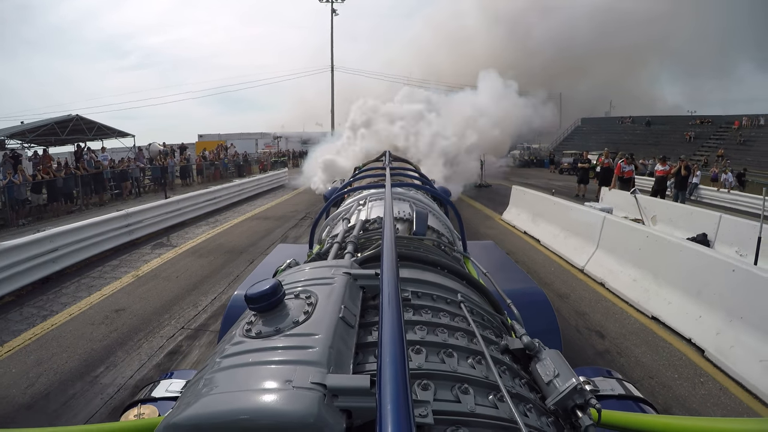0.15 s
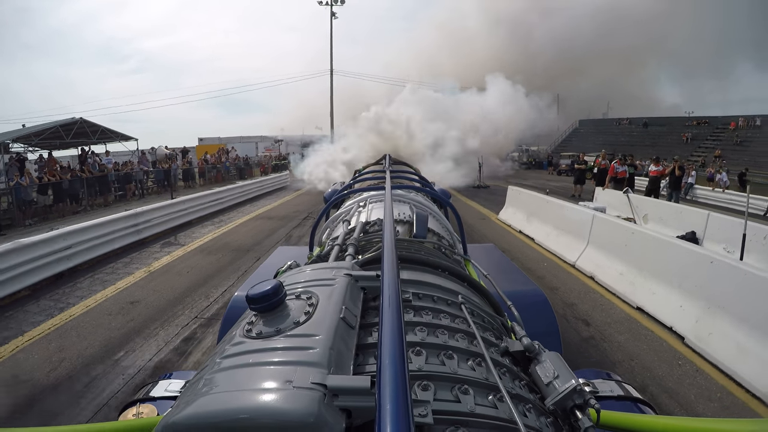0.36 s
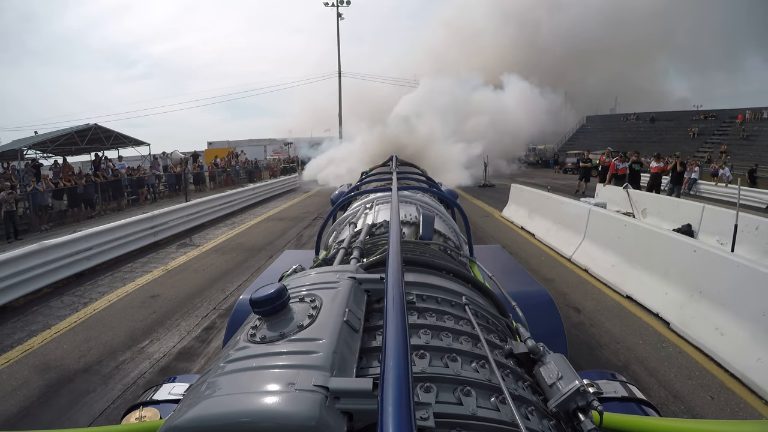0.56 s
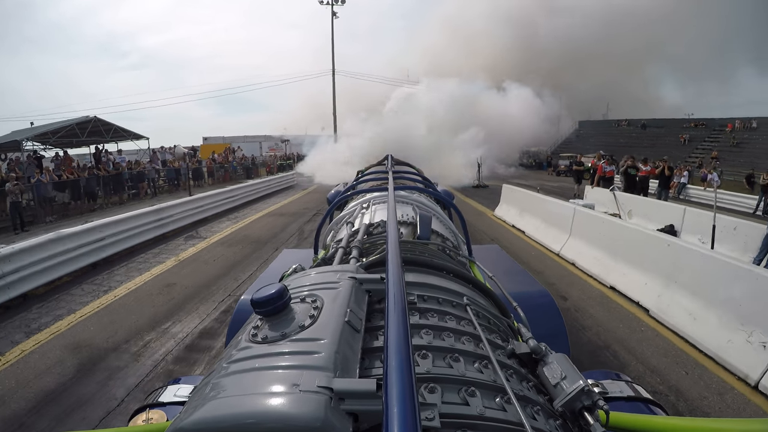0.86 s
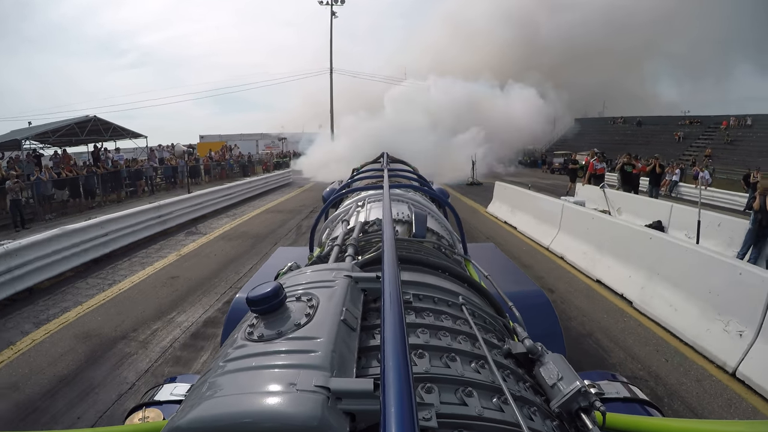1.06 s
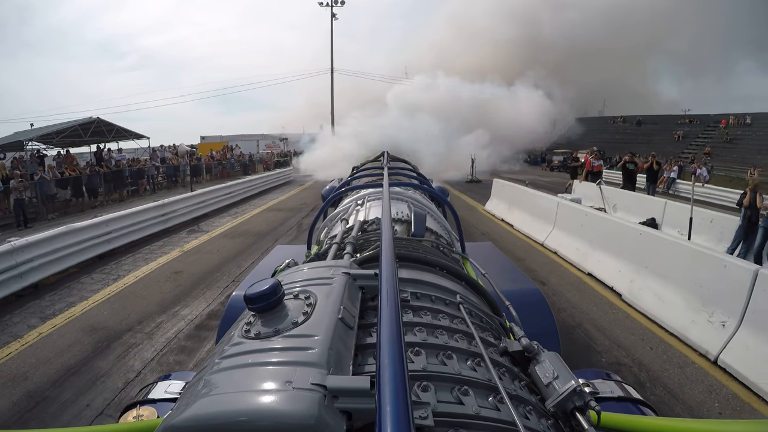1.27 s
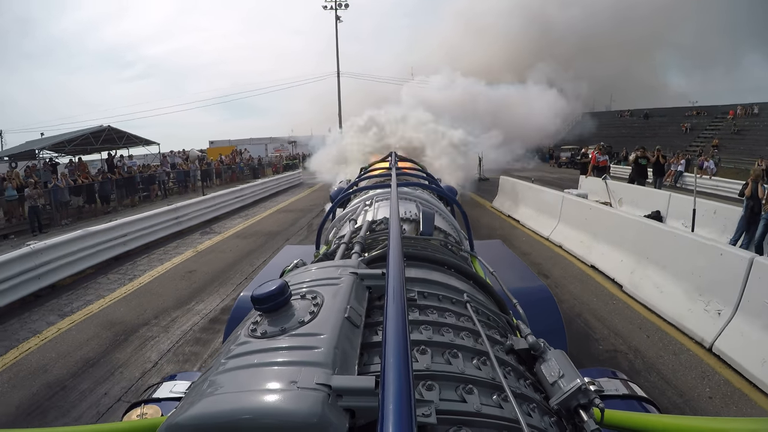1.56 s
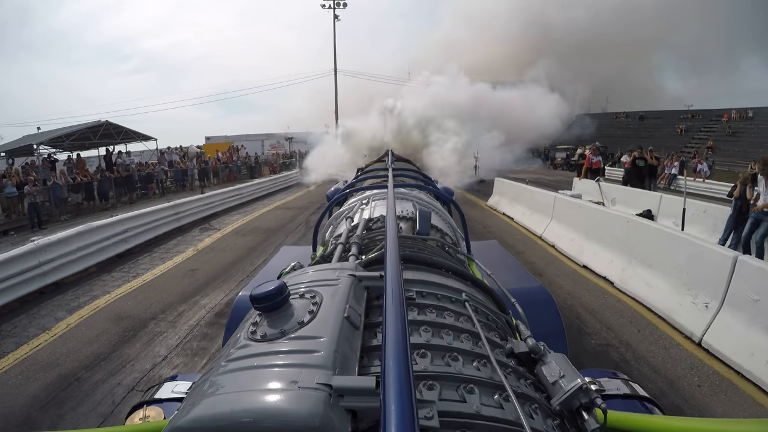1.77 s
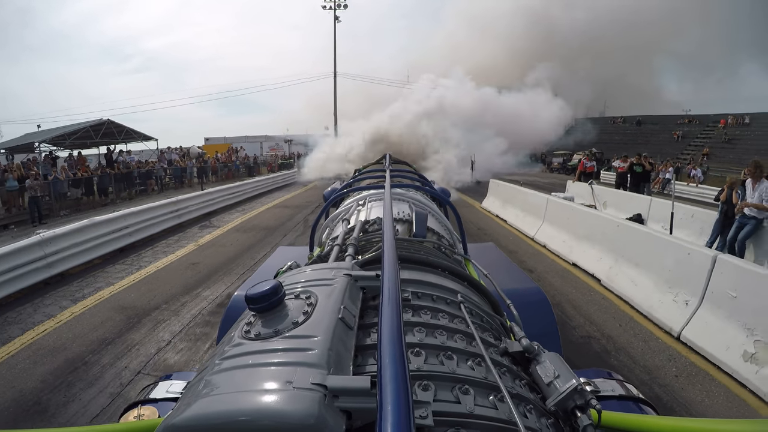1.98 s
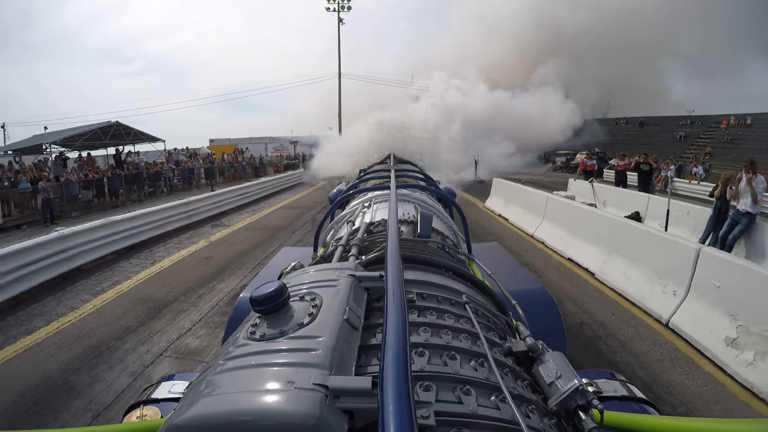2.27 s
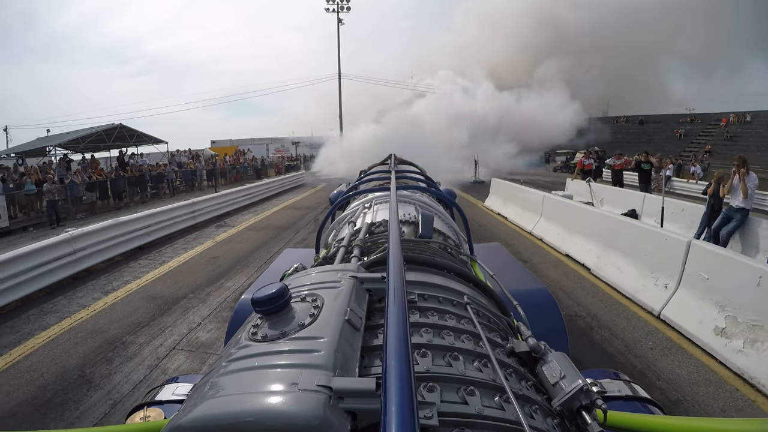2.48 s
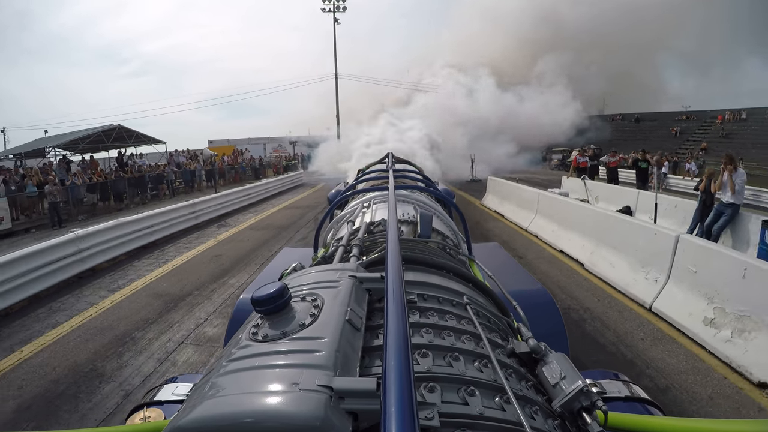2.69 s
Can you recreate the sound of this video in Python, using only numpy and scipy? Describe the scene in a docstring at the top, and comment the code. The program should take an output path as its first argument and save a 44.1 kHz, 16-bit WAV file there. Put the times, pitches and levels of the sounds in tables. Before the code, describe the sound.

A jet engine whines piercingly and roars up close, pitch sagging and rising, with wind thumps

```python
"""Jet dragster on the throttle

A jet dragster on the strip, heard from just above its engine, while the throttle is worked up and down.
The compressor whines at the blade counts of its stages, as sines locked to one gliding shaft speed.
Shaped noise makes the intake hiss and the exhaust's roar and boom; the tailpipe hums briefly on steady sines.
Wind is low noise plus a few pressure swings that thump the microphone. Both ears hear the same.
"""
import sys
import numpy as np
from scipy.fft import rfft, irfft, next_fast_len
from scipy.io import wavfile
from scipy.ndimage import uniform_filter1d, map_coordinates

SR = 44100
rng = np.random.default_rng(int(sys.argv[2]) if len(sys.argv) > 2 else 0)


def unload_audio(sound):
    """Save the sound as a 16-bit wav file, at the path given as the first command line argument."""
    columns = np.transpose(np.atleast_2d(sound))
    # keep every value between -1 and 1, then stretch to whole-number steps
    steps = np.round(np.clip(columns, -1, 1) * 32767)
    wavfile.write(sys.argv[1], SR, steps.astype(np.int16))


N = 125685

# air flow into the intake, before the lift of the hiss: t/s, level/dB
INTAKE_FLOW = [(0, -30.5), (.1, -28.5), (.55, -31.5), (1.05, -34), (1.5, -33), (1.6, -37), (1.74, -34),
               (1.92, -28.5), (2.2, -27), (2.42, -33), (2.66, -33), (2.74, -36), (2.85, -30.5)]
ROUGH_DB, ROUGH_HZ = 0.31, 28.27  # unsteadiness of hiss and roar: depth in dB, random knots per second


def amp(db):
    """Decibels to gain."""
    return 10 ** (np.asarray(db) / 20)


def unit(x):
    """Scaled to rms 1."""
    return x / np.sqrt(np.mean(np.abs(x) ** 2) + 1e-20)


def curves(rows):
    """One value per sample for each column after the time."""
    knot_s, *columns = np.transpose(rows)
    t = np.arange(N) / SR
    return [np.interp(t, knot_s, column) for column in columns]


def wobble(rate):
    """A smooth random curve through rate knots a second."""
    knots = rng.standard_normal(2048)
    position = np.arange(N) * rate / SR
    return map_coordinates(knots, [position], mode="wrap")


def gate(start, end):
    """Swells through half at start, holds at 1, and dies away through half at end."""
    swell_s = 0.034  # length of the full rise or fall
    t = np.arange(N) / SR
    return np.clip(np.minimum(t - start, end - t) / swell_s + 0.5, 0, 1)


def filtered(x, response):
    """x times a response of frequency, padded so that its tail does not wrap around."""
    padded = next_fast_len(N + SR // 4)
    spectrum = rfft(x, padded) * response(np.fft.rfftfreq(padded, 1 / SR))
    return irfft(spectrum, padded)[:N]


def noise(colour):
    """Noise of rms 1 whose spectrum follows the colour, straight in dB over log frequency."""
    f, db = np.transpose(colour)

    def response(hz):
        return amp(np.interp(np.log(hz + 1), np.log(f + 1), db))

    return unit(filtered(rng.standard_normal(N), response))


def steadied(x, size):
    """Narrow noise with its slow chance swells evened out over size samples."""
    power = np.abs(uniform_filter1d(x ** 2, size))
    return x / np.sqrt(power + 1e-6)


def wind():
    """Low buffeting noise, and single gusts that each give one short swing of pressure."""
    # buffeting: t/s, level/dB
    buffet_level = [(.1, -31), (.16, -13), (.23, -31), (.46, -19.5), (.5, -33), (.68, -28.5), (.75, -50),
                    (1.53, -56), (1.58, -18.5), (1.75, -14.5), (1.82, -33), (2.4, -46)]
    # its relative spectrum: f/Hz, density/dB per Hz
    buffet_colour = [(10, -2), (30, 0), (65, 1.5), (100, -7), (300, -24), (1000, -57)]
    # gusts that thump the microphone: t/s, peak/dB, length/s (from the peak to 1/e of the envelope)
    thumps = [(0.134, -2, 0.015), (1.57, -1.5, 0.0091), (1.692, -4, 0.0087), (1.735, -8, 0.015)]
    cycles_per_length = 0.49
    t = np.arange(N) / SR
    level_db, = curves(buffet_level)
    out = amp(level_db) * steadied(noise(buffet_colour), size=4000)
    for peak_s, db, length_s in thumps:
        u = (t - peak_s) / length_s
        swing = np.exp(-u ** 2) * np.cos(2 * np.pi * cycles_per_length * u)
        out = out - amp(db) * swing
    return out


def exhaust():
    """The burning jet roars; the tailpipe booms at its low resonances and now and then locks onto a clean note."""
    # t/s, roar level/dB, boom level/dB
    exhaust_levels = [(0, -24.5, -24.5), (.14, -21.5, -23.5), (.48, -25.5, -20), (.6, -30, -25.5),
                      (.92, -28, -31), (1.1, -25.5, -24.5), (1.3, -21, -23), (1.5, -21.5, -22.5),
                      (1.67, -26.5, -18.5), (1.85, -24, -22), (2.1, -26, -26.5), (2.45, -29.5, -31.5),
                      (2.63, -23, -20), (2.75, -24.5, -26.5)]
    # relative spectra of roar and boom: f/Hz, density/dB per Hz
    roar_colour = [(20, -4.5), (220, 2.5), (265, -11.5), (313, -2), (380, -14.5), (480, -15), (541, 1),
                   (590, -10), (660, 6), (720, -2), (770, 3.5), (860, -5), (990, 5), (1400, -7), (2800, -4),
                   (15000, -52)]
    boom_colour = [(110, -43), (135, -17.5), (153, 4.5), (170, -5.5), (187, 1), (275, -38), (313, -17),
                   (370, -47.5)]
    # clean notes of the tailpipe: start/s, end/s, f/Hz, level/dB
    hums = [(0.237, 0.37, 156.6, -18.5), (1.22, 1.41, 152, -18.5), (1.257, 1.501, 313, -35.5),
            (1.465, 1.535, 187.2, -15), (1.78, 1.931, 165, -15.5), (1.795, 2.107, 670, -35)]
    t = np.arange(N) / SR
    roar_db, boom_db = curves(exhaust_levels)
    roar = amp(roar_db + ROUGH_DB * wobble(ROUGH_HZ)) * noise(roar_colour)
    boom = amp(boom_db) * steadied(noise(boom_colour), size=2600)
    hum = np.zeros(N)
    for start, end, hz, db in hums:
        sine = np.sqrt(2) * np.sin(2 * np.pi * hz * t)  # rms 1
        hum += amp(db) * gate(start, end) * sine
    return roar + hum + boom


def intake():
    """Air hisses into the engine; the stronger the flow, the louder and brighter."""
    # relative spectrum of the hiss: f/Hz, density/dB per Hz
    hiss_colour = [(1000, -15), (2000, -1.5), (2380, 8.5), (2650, 3), (2830, 6.5), (3150, -4), (3800, 1),
                   (4150, -5), (4700, -0.5), (5600, -3), (6600, 0), (7400, -6.5), (15300, -19.5)]
    lift_db = 7  # of the hiss over the flow curve
    treble_hz, treble_grows = 7400, 0.2  # above this, extra dB for each dB of flow over its mean
    flow_db, = curves(INTAKE_FLOW)
    hiss = noise(hiss_colour)
    treble = filtered(hiss, lambda hz: hz > treble_hz)
    body = hiss - treble
    bright = body + treble * amp(treble_grows * (flow_db - flow_db.mean()))
    return amp(flow_db + lift_db + ROUGH_DB * wobble(ROUGH_HZ)) * bright


def compressor():
    """Each stage sings at its blade count times the shaft speed; intake turbulence makes the tones flutter."""
    # engine speed as the pitch of the first stage, before smoothing: t/s, f/Hz
    whine_pitch = [(0, 2303), (.1, 2322), (.22, 2291), (.34, 2278), (.52, 2298), (.62, 2279), (.8, 2215),
                   (1.0, 2158), (1.2, 2110), (1.3, 2136), (1.55, 2227), (1.8, 2323), (1.95, 2358),
                   (2.05, 2347), (2.3, 2253), (2.52, 2185), (2.62, 2201), (2.85, 2302)]
    # tones of the first and second stage: t/s, level/dB
    first_level = [(0, -26.5), (.16, -19.5), (.46, -16.5), (.66, -14), (.84, -16), (.9, -23), (.99, -18),
                   (1.05, -31.5), (1.18, -19.5), (1.29, -26.5), (1.52, -14.5), (1.68, -14.5), (1.82, -23.5),
                   (1.86, -32.5), (2.03, -19), (2.19, -20), (2.23, -28), (2.27, -18.5), (2.44, -14),
                   (2.51, -21.5), (2.77, -12.5), (2.85, -24)]
    second_level = [(.17, -49), (.25, -25.5), (.66, -27), (.95, -24), (1.04, -17.5), (1.24, -28),
                    (1.37, -15.5), (1.55, -37.5), (1.71, -25), (1.8, -55), (2.1, -51), (2.2, -26),
                    (2.44, -25.5), (2.67, -32.5), (2.83, -23)]
    # upper tones of later stages and overtones: multiple of the shaft speed
    upper_orders = [27, 42, 48, 63, 84]
    # their levels in the same order, at the slowest and fastest engine speed: level/dB
    slow_levels = [-42, -35, -41, -34.5, -48.5]
    fast_levels = [-42, -40.5, -51.5, -46.5, -54]
    # upper tones that flare up for a moment: start/s, end/s, multiple of the shaft speed, level/dB
    flares = [(0, 0.15, 42, -31.5), (0.565, 0.906, 27, -33.5), (.59, 0.752, 42, -32.5),
              (.65, 0.813, 46, -43), (0.817, 0.89, 33, -36), (1.12, 1.207, 121, -51),
              (1.907, 2.09, 27, -29.5), (1.933, 2.037, 42, -30), (2.11, 2.19, 63, -31),
              (2.183, 2.372, 27, -26.5), (2.214, 2.277, 42, -26.5), (2.26, 2.42, 46, -36),
              (2.76, 2.823, 42, -30.5)]
    # whine smeared by turbulence: multiple of the shaft speed, width/Hz, level over the flow curve/dB
    skirts = [(21.33, 56, 0.5)]
    first_blades, second_blades = 21, 23
    flutter_db, flutter_hz = 1.39, 45.4  # depth, and random knots per second
    phase_wander = 0.1  # radians at the first stage, growing with the order
    fade_db, fades_per_s = 2.5, 13  # how deep and fast the upper tones come and go

    whine_hz = uniform_filter1d(curves(whine_pitch)[0], size=2205)  # smoothed over 50 ms
    shaft = 2 * np.pi * np.cumsum(whine_hz) / first_blades / SR  # shaft angle in radians

    def tone(order, gain):
        """A fluttering sine locked to the shaft."""
        wander = phase_wander * order / first_blades * wobble(flutter_hz)
        flutter = amp(flutter_db * wobble(flutter_hz))
        return np.sqrt(2) * gain * flutter * np.sin(order * shaft + wander)

    def skirt(order, width_hz, db):
        """Narrow noise that glides with the shaft and grows with the intake flow."""
        def slow_noise():
            return unit(filtered(rng.standard_normal(N), lambda hz: 1 / (1 + (hz / width_hz) ** 2)))

        smear = slow_noise() * np.cos(order * shaft) + slow_noise() * np.sin(order * shaft)
        return amp(db + curves(INTAKE_FLOW)[0]) * smear

    first = tone(first_blades, amp(curves(first_level)[0]))
    second = tone(second_blades, amp(curves(second_level)[0]))
    gains = {}
    for order, slow_db, fast_db in zip(upper_orders, slow_levels, fast_levels):
        db = np.interp(whine_hz, [whine_hz.min(), whine_hz.max()], [slow_db, fast_db])
        gains[order] = amp(db + fade_db * wobble(fades_per_s))
    for start, end, order, db in flares:
        flare = amp(db) * gate(start, end)
        gains[order] = np.maximum(gains.get(order, 0), flare)  # the stronger one wins
    upper = sum(tone(order, gain) for order, gain in gains.items())
    return first + second + upper + sum(skirt(*row) for row in skirts)


def scene():
    """Wind and engine, the same in both channels."""
    mono = wind() + exhaust() + intake() + compressor()
    return np.array([mono, mono])


def record(dry):
    """The camera rounds off the highest peaks and keeps nothing above its band limit."""
    top_hz = 15350
    held = dry / (1 + np.abs(dry) ** 8) ** (1 / 8)
    return np.array([filtered(channel, lambda hz: hz < top_hz) for channel in held])


dry = scene()
out = record(dry)
unload_audio(out)
```